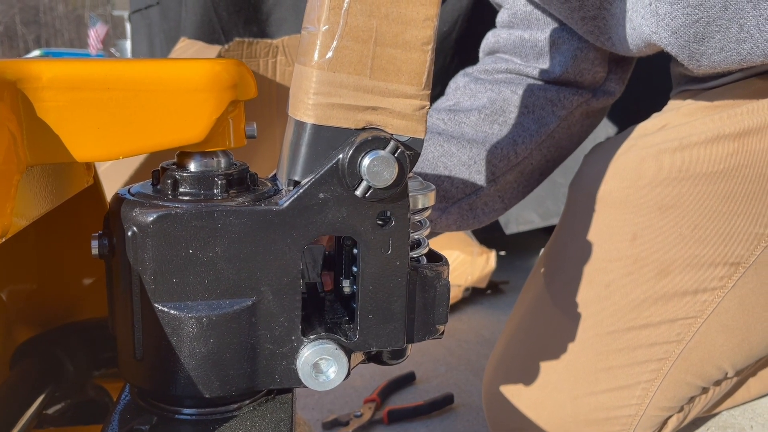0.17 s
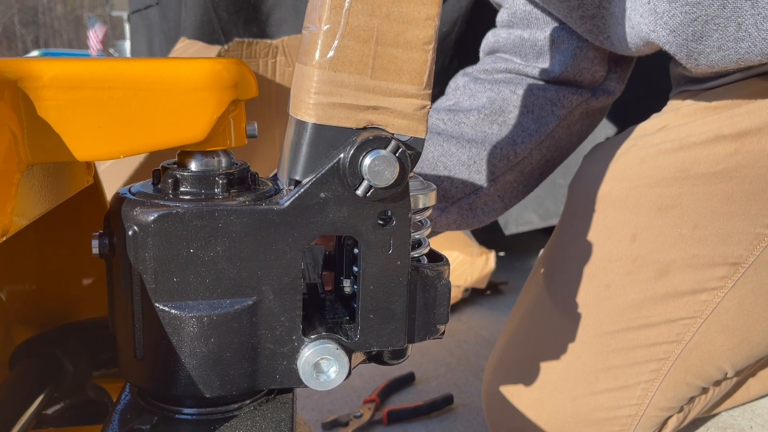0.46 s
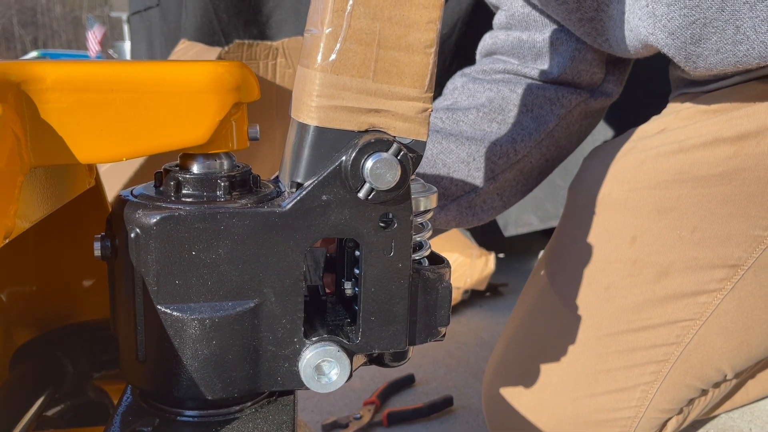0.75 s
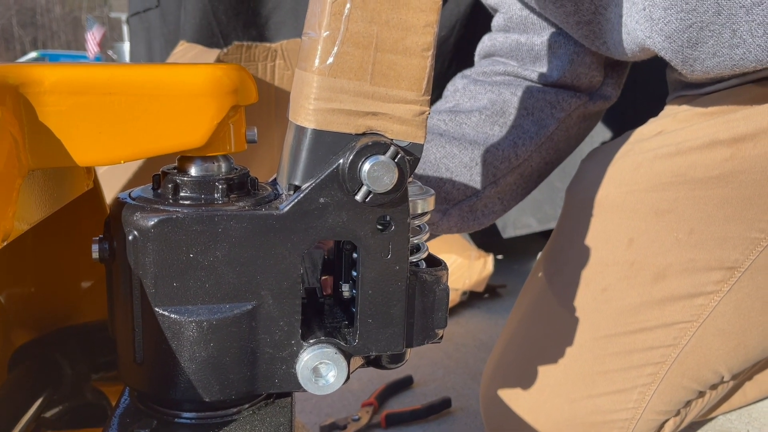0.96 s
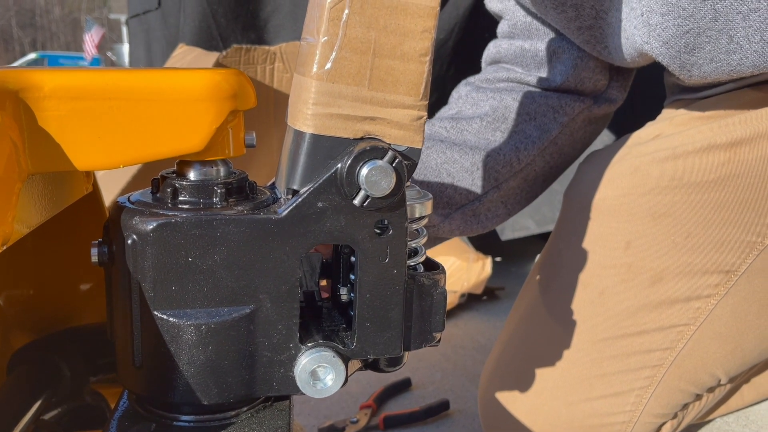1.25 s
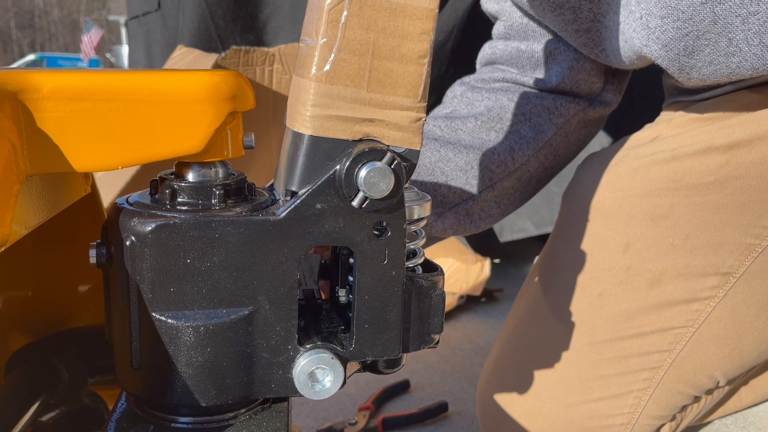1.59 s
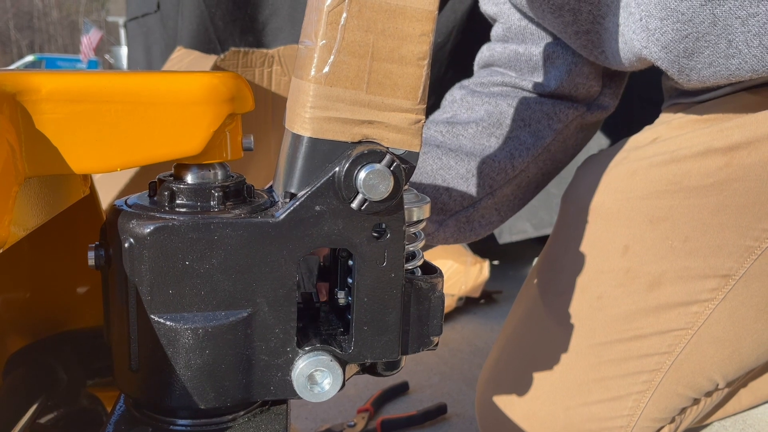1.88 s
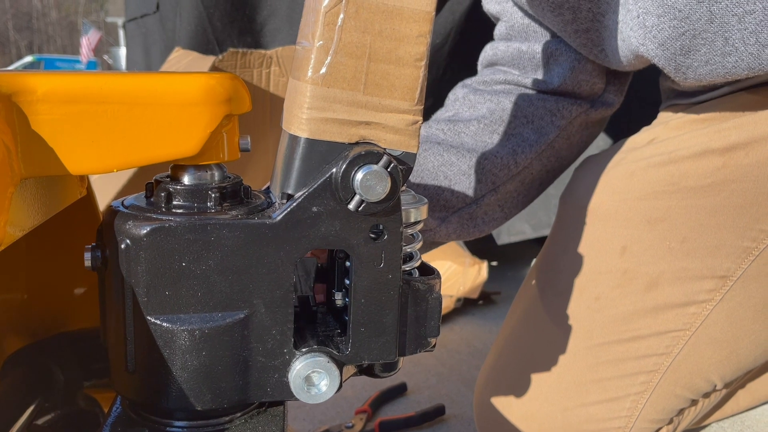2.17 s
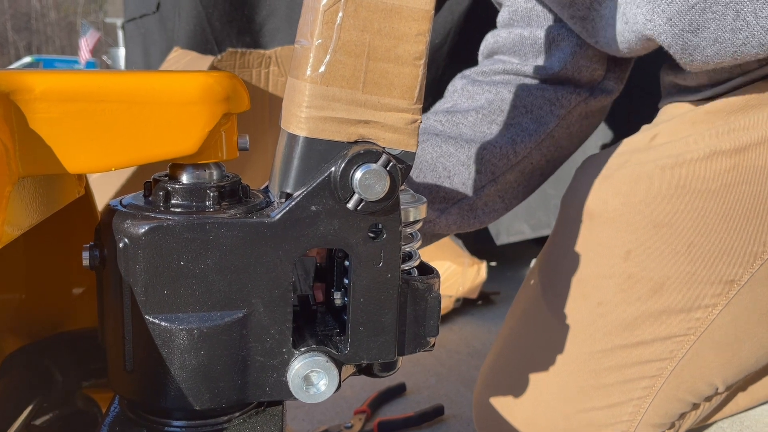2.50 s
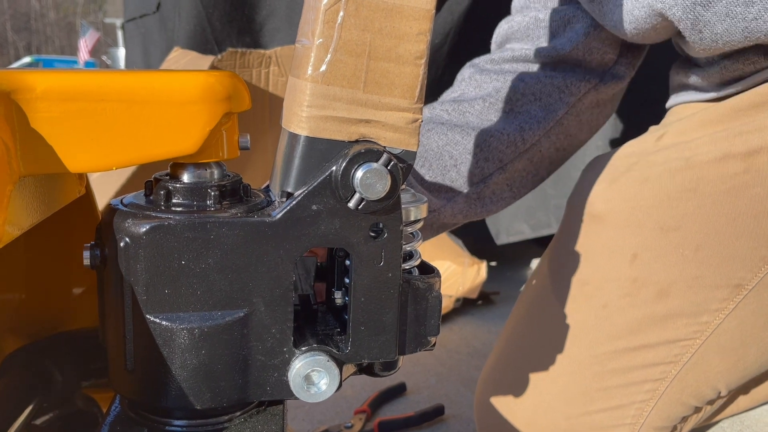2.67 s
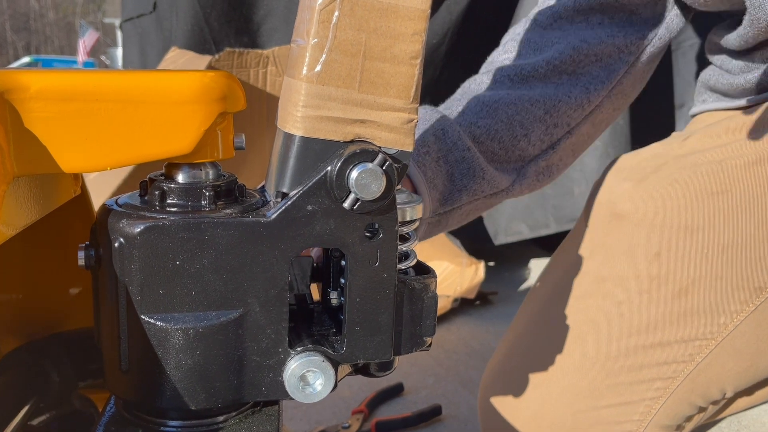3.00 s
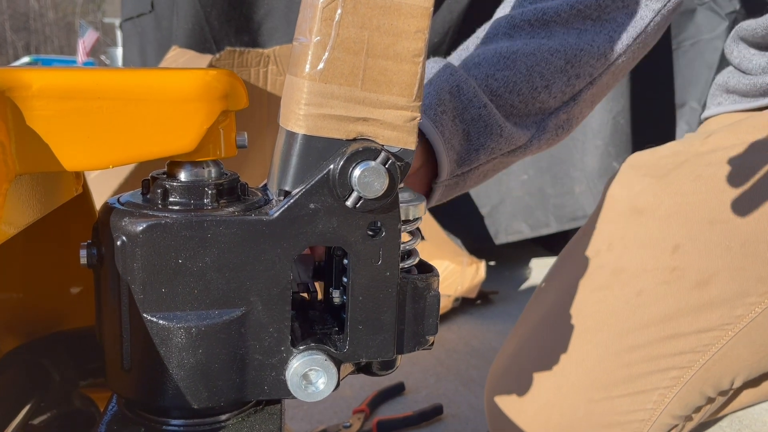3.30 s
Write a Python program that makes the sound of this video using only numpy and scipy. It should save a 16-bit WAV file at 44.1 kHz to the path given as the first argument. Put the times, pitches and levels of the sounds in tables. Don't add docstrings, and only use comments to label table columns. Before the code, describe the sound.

Hands work metal pump parts close to the microphone; small clicks, then a firm pin-and-lever clack, cloth rustle and stand bumps, then a hard clank with rebounds, while far traffic hums low outdoors.

```python
import sys
import numpy as np
from scipy import signal
from scipy.fft import rfft, irfft
from scipy.io import wavfile
from scipy.ndimage import uniform_filter1d

SR = 44100
rng = np.random.default_rng(int(sys.argv[2]) if len(sys.argv) > 2 else 0)


def materialize(psi):
    bounded = np.clip(np.atleast_2d(psi).T, -1, 1)
    quanta = np.round(bounded * 32767).astype(np.int16)
    wavfile.write(sys.argv[1], SR, quanta)


def voltage_ratio(decibels):
    exponent = np.asarray(decibels, float) / 20
    return 10 ** exponent


N = 152145
T = np.arange(N) / SR
HZ = np.fft.rfftfreq(N, 1 / SR)
LONG = np.arange(SR // 4) / SR

# pitch_hz, level_db
TOWN_COLOUR = [(22, -20.5), (55, -3.5), (110, -6.5), (330, -26.5), (900, -46.5), (1700, -46), (5000, -57.5),
               (12500, -53.5)]
# pitch_hz, likeness (0-1)
TOWN_ALIKE = [(60, 1), (250, 0.83), (1000, 0.13), (4000, 0.4), (9000, 0.3), (11000, 0.22)]
# start_s, level_db, pitch_hz, swell_s
BUMPS = [(2.08, -36.5, 71, 0.0082), (2.129, -34.5, 61, .012), (2.484, -39.5, 73, 0.011),
         (2.516, -33, 73, 0.0032), (2.53, -25, 110.5, 0.0024), (2.548, -31.5, 119, 0.0033),
         (2.6, -38.5, 59.5, 0.011), (2.688, -39, 71.5, 0.016), (0.396, -41, 106, 0.0034),
         (2.939, -40.5, 57, 0.028), (3.134, -23.5, 67, 0.0098), (3.252, -39.5, 65, 0.011),
         (3.287, -34.5, 72, 0.0046)]
# start_s, length_s, level_db, scuff_db
RUSTLES = [(0.345, 0.11, -72, 14), (0.49, 0.072, -71, 7), (0.65, .2, -78, 6), (0.815, 0.12, -76.5, 2),
           (1.45, 0.27, -82, 9.5), (2.082, 0.24, -77, 2.5), (2.32, 1.38, -67.5, -2.5),
           (2.41, 0.13, -62.5, 4), (2.458, 0.04, -69.5, 18), (1.1, 0.065, -89, 16), (2.632, 0.11, -60, -11),
           (2.765, 0.04, -61, -4), (2.86, 0.051, -51, -33), (3.075, 0.16, -60, -11), (3.222, 0.095, -71, 9)]
# pitch_hz, level_db
CLOTH_COLOUR = [(400, 4.5), (1000, -2), (2000, -3), (4700, -8.5), (8600, -3), (11200, -4.5), (12800, -5)]
# pitch_hz, likeness (0-1)
HISS_ALIKE = [(4000, .3), (9000, .4), (11000, .9)]
# pitch_hz, likeness (0-1)
NEAR_ALIKE = [(250, .95), (1000, .1), (3000, .4), (8000, .55), (11500, .97)]
# start_s, level_db
PIN_HITS = [
    (.191, -71.5),
    (1.887, -73),
    (1.918, -30),
    (1.93, -30),
    (3.097, -43),
]
# pitch_hz, level_db, t60_s
PIN_MODES = [(3578, -2, .055), (7197, -15, .05), (7297, -11, .085), (8692, 0, .058), (9372, -12, .09),
             (10820, -22, .1)]
# start_s, level_db
LEVER_HITS = [
    (1.753, -45),
    (1.781, -50),
    (1.9186, -32.5),
    (1.938, -36.5),
    (2.515, -45.5),
    (3.0635, -27.5),
    (3.081, -34.5),
]
# pitch_hz, level_db, t60_s
LEVER_MODES = [(2813, -3, 0.068), (2840, 1, 0.02), (2884, -8, 0.18)]
# start_s, level_db, dull_db, t60_s
TICKS = [(0.254, -61.5, -2, 0.087), (0.3314, -51.5, -19, 0.028), (0.354, -53, -19, 0.047),
         (0.383, -51, 2, 0.035), (0.3983, -46, -4.5, 0.1), (0.442, -46, -8, 0.077),
         (0.5116, -54.5, -16, 0.081), (0.5313, -56, -13, 0.031), (0.7294, -58, -1, 0.027),
         (0.7578, -61, -18, 0.036), (0.7748, -55, -24, 0.043), (0.8644, -60, -7, 0.063),
         (1.8862, -51.5, 3, 0.1), (2.0362, -54, -14, 0.034), (2.106, -49, -6, 0.027),
         (2.139, -50.5, -1, 0.064), (2.1773, -52.5, -3, 0.1), (2.2443, -54.5, -18, 0.035),
         (2.3312, -42, 0.5, 0.065), (2.4167, -46, -19, 0.045), (2.4375, -38.5, -5, 0.025),
         (2.8646, -45, -8, 0.021), (2.8746, -52.5, -1.5, 0.1), (2.8959, -56, 4, 0.028),
         (3.059, -42, 3, 0.017), (0.448, -55, -1, 0.024), (0.415, -60, 0, 0.037), (0.506, -57, -4, 0.03),
         (0.52, -58, -15, 0.03), (2.426, -48, 0.5, 0.03), (2.462, -57, 13, 0.045), (3.282, -52, 5, 0.02),
         (1.205, -71.5, 8, 0.05), (3.222, -41, 8, 0.11), (3.248, -49, -26, 0.031), (3.266, -49, -13, 0.03),
         (3.3482, -51, 3.5, 0.053), (3.4464, -38, 7.5, 0.085)]
# pitch_hz, level_db
TICK_COLOUR = [(4500, -7), (6000, -5), (8500, 10), (10000, -3), (11500, 4.5), (12900, -14)]
# pitch_hz, level_db
DULL_COLOUR = [(500, -12.0), (1650, -1.5), (2400, -7.5), (3900, -1), (7000, -20)]
# start_s, level_db, pitch_hz, t60_s
SPOTS = [(.191, -69.5, 1690, 0.39), (.341, -63, 2830, 0.028), (.365, -65, 1480, 0.063),
         (.384, -59.5, 1700, 0.05), (.384, -61.5, 2980, 0.034), (.4, -58, 1650, .04),
         (.414, -67, 1710, .05), (.449, -62, 1680, 0.047), (1.11, -71, 1620, 0.12),
         (1.344, -58, 653, 0.037), (1.452, -70, 942, 0.19), (1.527, -71, 1720, 0.19),
         (1.752, -57, 1700, .2), (1.752, -60, 1560, .1), (1.752, -62, 3900, 0.11),
         (1.781, -54.5, 1526, .06), (1.781, -53.5, 675, .14), (1.781, -61, 3840, 0.043),
         (1.887, -59, 3580, 0.028), (1.919, -45, 1690, .12), (1.919, -45, 3900, 0.074),
         (1.919, -53.5, 2297, 0.24), (2.362, -48.5, 2140, 0.039), (2.364, -57.5, 1158, 0.1),
         (2.362, -56.5, 1583, 0.07), (2.47, -51, 3900, 0.02), (2.489, -44, 3499, 0.026),
         (2.515, -43.5, 3870, 0.039), (2.515, -44.5, 2860, 0.085), (2.996, -54.5, 2800, .02),
         (2.996, -77, 3920, 0.011), (3.064, -30, 3870, 0.059), (3.064, -31, 4000, 0.036),
         (3.068, -34, 3500, .14), (3.074, -36, 2300, .1), (3.064, -36.5, 1614, 0.031),
         (3.0965, -35.5, 4040, 0.029), (3.0965, -36, 4670, 0.022), (3.159, -39, 3920, 0.023),
         (3.159, -46, 1150, .04), (3.231, -49, 1870, 0.037), (2.497, -45, 1300, 0.029)]
# start_s, level_db, low_body_db, treble_db, ring_length (share)
KNOCKS = [(0.19, -55.5, -9, -18, 1.07), (0.3401, -68.5, -1.5, -11, 0.95), (1.1067, -61, -16, -20, 1),
          (1.3434, -80, 5, -6, 0.26), (1.4513, -63, -4, -25, 1.05), (1.5256, -65.5, -0.5, -9, 1),
          (1.7514, -47, -7.5, -25, 1.27), (1.7799, -44, -13.5, -24, 0.62), (1.9196, -26, -17, -37, 1.11),
          (2.3619, -41, -15, -7.5, 0.59), (2.4892, -33.5, -17.5, -13, 0.81), (2.5127, -35, -29, -16, 1.04),
          (2.9958, -41.5, -11.5, -32, 0.99), (3.0633, -20, -17.5, -15.5, 0.92),
          (3.0956, -29, -50, -7.5, 0.71), (3.157, -44, -15, 1, 0.67), (3.2287, -47.5, -16.5, -22.5, 0.79),
          (3.294, -49.5, -14, -23, 1)]
# pitch_hz, level_db, t60_s
BODY_MODES = [(657, -13, .11), (736, -11, .1), (1165, -9, .1), (1518, -15, .09), (1696, -14, .1),
              (1852, -13, .08), (2293, -12, .09), (2508, -13, .08), (3500, -11, .06), (3826, -11, .06),
              (4060, -13, .05)]
# pitch_hz, level_db
CLATTER_COLOUR = [(250, -11.5), (700, -4), (1100, -6.5), (2000, -2.5), (2900, -3), (4150, -10),
                  (4600, -9.5), (12500, -34.5)]

KNOCK_PAN_DB = 4
PORT_LAG_S = 0.00005


def read(table, hz):
    f, v = np.array(table).T
    return np.interp(np.log(np.maximum(hz, 1)), np.log(f), v)


def unit(x):
    return x / np.sqrt(np.mean(x ** 2))


def noise(table, alike, lo_hz=1, hi_hz=30000):
    mid, side = rng.standard_normal((2, len(HZ), 2)) @ np.array([1, 1j]) * np.sqrt(N / 2)
    alike = np.clip(alike, 0, 1)
    inside = (HZ > table[0][0]) * (HZ < table[-1][0])
    gain = voltage_ratio(read(table, HZ)) * inside
    sides = np.array([[1], [-1]])
    pair = mid * np.sqrt((1 + alike) / 2) + side * np.sqrt((1 - alike) / 2) * sides
    edge = 1 / np.sqrt((1 + (lo_hz / (HZ + 1)) ** 10) * (1 + (HZ / hi_hz) ** 10))
    return irfft(pair * gain * edge, N) / np.sqrt(np.mean(gain ** 2))


def walk(rate):
    k = int(SR / rate)
    steps = np.repeat(rng.standard_normal(N // k + 1), k)
    return 0.66 * uniform_filter1d(uniform_filter1d(steps, k), k)[:N]


def fade(t60, rise=0.00073):
    return (1 - np.exp(-LONG / rise)) * np.exp(-np.log(1000) * LONG / t60)


def pan(db):
    return voltage_ratio(np.array([[db / 2], [-db / 2]]))


def at(x, s):
    return x.take(int(s * SR) + np.arange(len(LONG)), axis=1, mode="wrap")


def add(out, s, x):
    i = int(s * SR)
    out[:, i:i + x.shape[1]] += x[:, :N - i]


def ring(modes, stretch, luck, lag):
    contact_s, spread_db = 0.0004, 2.0
    t = np.maximum(LONG - np.array([[0], [lag]]), 0)
    tone = 0
    for (hz, db, t60), z in zip(modes, luck):
        turning = 2j * np.pi * hz * (1 + 0.0018 * z)
        decay = np.log(1000) / (t60 * stretch)
        tone = tone + voltage_ratio(db + spread_db * z) * np.exp((turning - decay) * t).imag
    return (1 - np.exp(-t / contact_s)) * tone


def town():
    out, swell, alike = 0, walk(1.0), read(TOWN_ALIKE, HZ)
    for hz in 16 * 3.0 ** np.arange(7):
        flicker = voltage_ratio(0.58 * swell + 1.12 * walk(5.66))
        out = out + noise(TOWN_COLOUR, alike, hz, 3 * hz) * flicker
    return out * voltage_ratio(-51.5) * pan(1.5)


def bumps():
    out = np.zeros((2, N))
    t = np.maximum(LONG - np.array([[0.00064], [0]]), 0)
    for s, db, hz, swell in BUMPS:
        push = np.e * t / swell * np.exp(-t / swell)
        add(out, s, -voltage_ratio(db) * push * np.sin(2 * np.pi * hz * t))
    return out * pan(0.52)


def sleeve():
    edge_s = 0.021
    hiss_grain = unit(voltage_ratio(7.1 * walk(40.01) + 4.3 * walk(450)))
    scuff_grain = unit(voltage_ratio(4.9 * walk(60) + 3.4 * walk(250)))
    hiss = noise(CLOTH_COLOUR, read(HISS_ALIKE, HZ), lo_hz=3500) * hiss_grain
    scuff = noise(CLOTH_COLOUR, 0.36, hi_hz=3370) * scuff_grain * pan(3.0)
    out = 0
    for s, length, db, scuff_db in RUSTLES:
        stroke = voltage_ratio(db) * np.clip(np.minimum(T - s, (s + length - T) / 2) / edge_s, 0, 1)
        out = out + stroke * (hiss + voltage_ratio(scuff_db) * scuff)
    return out


def part(modes, hits, lag, pan_db):
    out, luck = np.zeros((2, N)), rng.standard_normal((len(hits), 8)) / 4
    for (s, db), z in zip(hits, luck):
        add(out, s, voltage_ratio(db) * ring(modes, 1, z, lag))
    return out * pan(pan_db)


def pin():
    return part(PIN_MODES, PIN_HITS, 0.00002, 1)


def lever():
    return part(LEVER_MODES, LEVER_HITS, PORT_LAG_S, KNOCK_PAN_DB)


def ticks():
    out, alike = np.zeros((2, N)), read(NEAR_ALIKE, HZ)
    bright, dull = noise(TICK_COLOUR, alike), noise(DULL_COLOUR, alike)
    crack = 2 * fade(0.012)
    for s, db, dull_db, t60 in TICKS:
        grit = at(bright, s) + voltage_ratio(dull_db - 2.5) * at(dull, s)
        add(out, s, voltage_ratio(db - 13) * (fade(t60) + crack) * grit)
    return out * pan(2.5)


def spots():
    out, luck = np.zeros((2, N)), rng.standard_normal((len(SPOTS), 2))
    for (s, db, hz, t60), z in zip(SPOTS, luck):
        trio = [(hz, db - 2, t60)]
        for side, shift in zip((-1, 2), z):
            trio.append((hz * (1 + 0.012 * (side + shift / 3)), db - 7, t60))
        add(out, s, ring(trio, 1, np.zeros(3), PORT_LAG_S))
    return out * pan(KNOCK_PAN_DB)


def knocks():
    clatter_db, clatter_t60_s, swell_s = -10, 0.093, 0.012
    out, luck = np.zeros((2, N)), rng.standard_normal((len(KNOCKS), 16))
    alike = read(NEAR_ALIKE, HZ)
    lows = noise(CLATTER_COLOUR, alike, hi_hz=1093)
    mids = noise(CLATTER_COLOUR, alike, lo_hz=1250)
    treble = unit(noise(TICK_COLOUR, alike)) * pan(-KNOCK_PAN_DB * 0.72)
    tail = voltage_ratio(-25.5) * fade(0.34, swell_s)
    for (s, db, low_db, treble_db, share), z in zip(KNOCKS, luck):
        ring_s = clatter_t60_s * share
        late_swell = voltage_ratio(clatter_db + 7) * fade(2.15 * ring_s, swell_s)
        quick_burst = voltage_ratio(clatter_db) * fade(ring_s, 0.00027)
        low = 0.23 * ring(BODY_MODES[:3], share, z[13:], 0.00014) + at(lows, s) * (late_swell + tail)
        hit = 0.23 * ring(BODY_MODES[3:], share, z, PORT_LAG_S) + at(mids, s) * (quick_burst + tail)
        top = at(treble, s) * fade(0.36 * ring_s)
        add(out, s, voltage_ratio(db) * (hit + voltage_ratio(low_db + 16) * low + voltage_ratio(treble_db) * top))
    return out * pan(KNOCK_PAN_DB)


def scene():
    rattle_db, rattle_per_s = 5.0, 110
    flutter = unit(voltage_ratio(rattle_db * walk(rattle_per_s)))
    loose = (lever() + spots()) * flutter
    return town() + bumps() + sleeve() + pin() + ticks() + loose + knocks()


def top_cut(x):
    return signal.sosfilt(signal.butter(12, 13030, fs=SR, output="sos"), x)


def record(dry):
    notch_hz, notch_width_hz, notch_db, top_hz = 10230, 190, -17, 12350
    dip = notch_db * np.exp(-((HZ - notch_hz) / notch_width_hz) ** 2)
    top = -32 / (1 + np.exp(np.clip((top_hz - HZ) / 150, -50, 50)))
    mix = irfft(rfft(dry) * voltage_ratio(dip + top), N)
    return top_cut(mix)


dry = scene()
out = record(dry)
materialize(out)
```